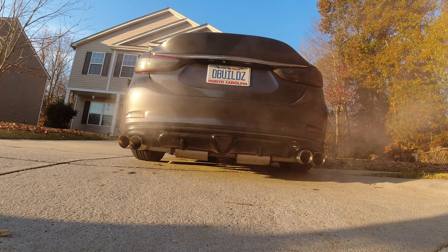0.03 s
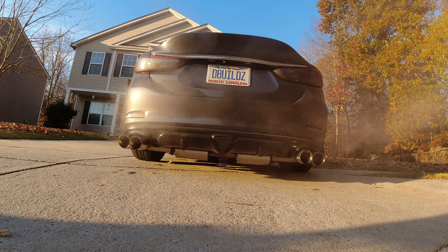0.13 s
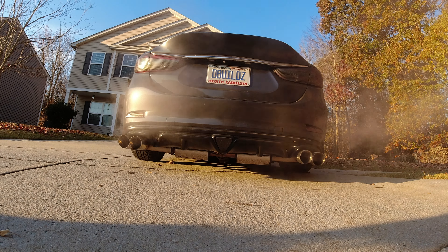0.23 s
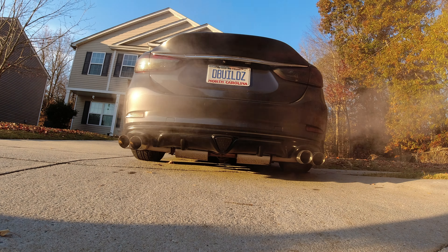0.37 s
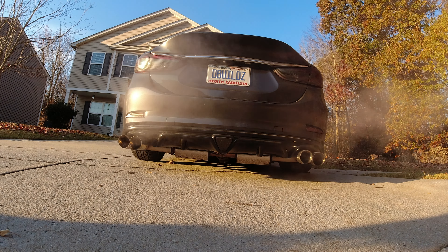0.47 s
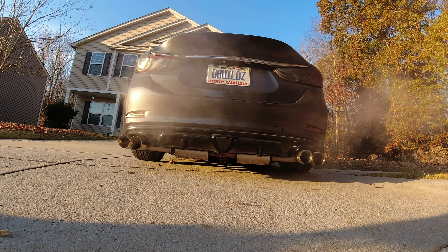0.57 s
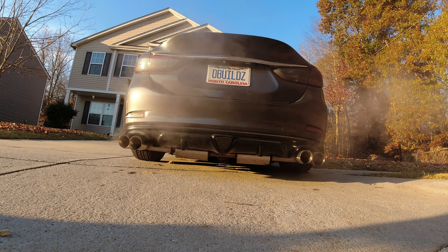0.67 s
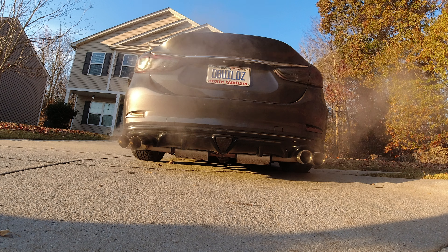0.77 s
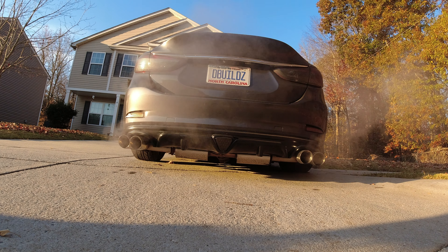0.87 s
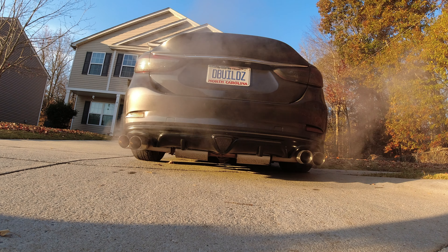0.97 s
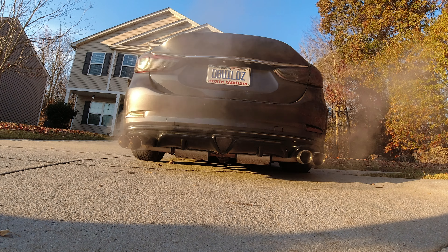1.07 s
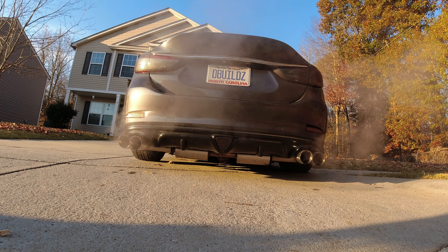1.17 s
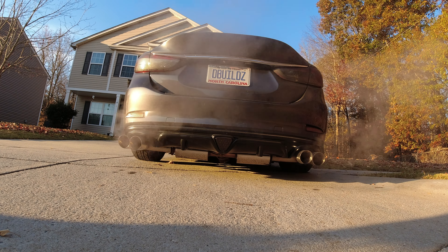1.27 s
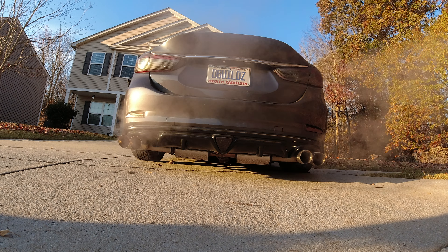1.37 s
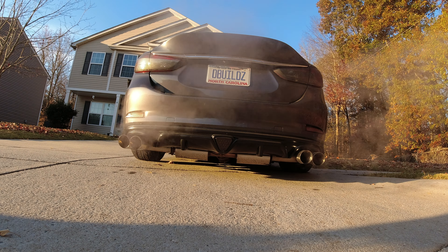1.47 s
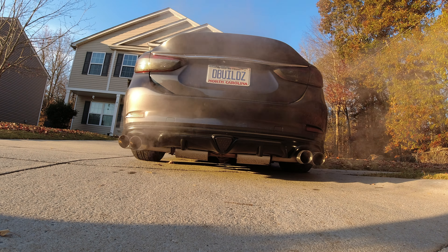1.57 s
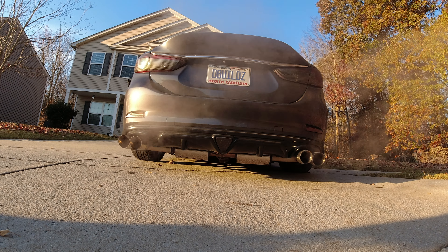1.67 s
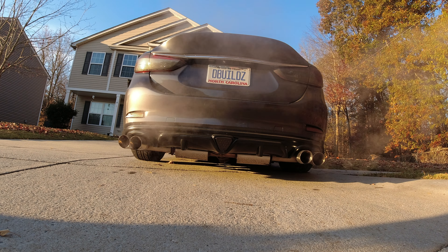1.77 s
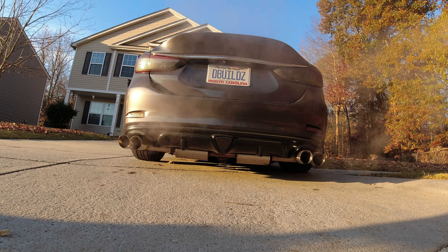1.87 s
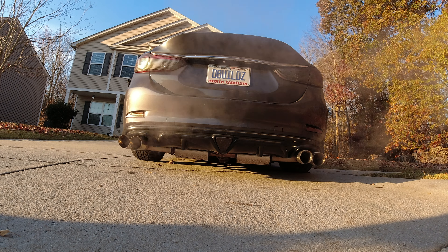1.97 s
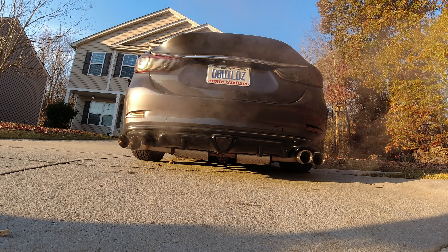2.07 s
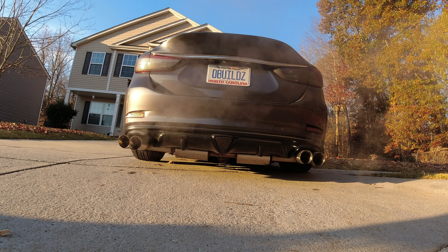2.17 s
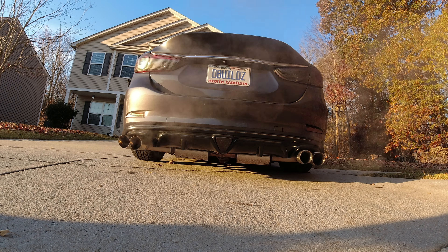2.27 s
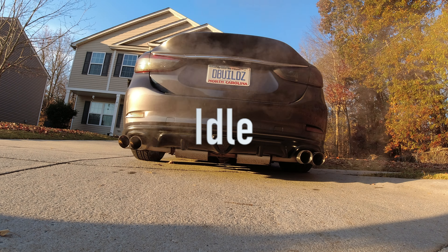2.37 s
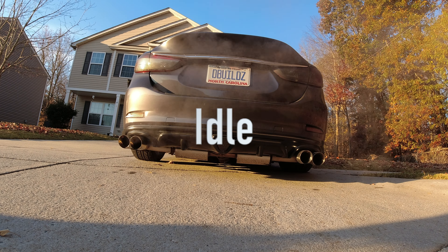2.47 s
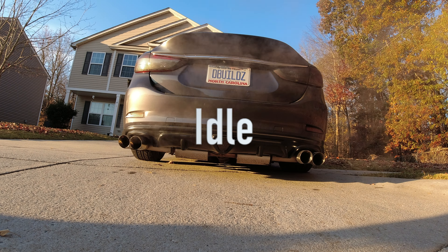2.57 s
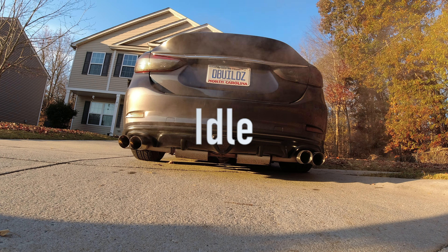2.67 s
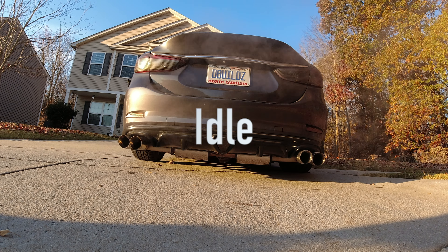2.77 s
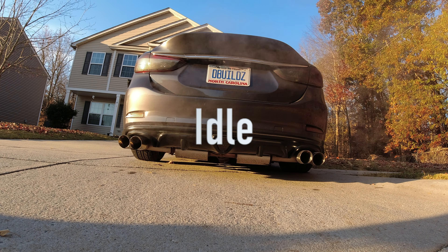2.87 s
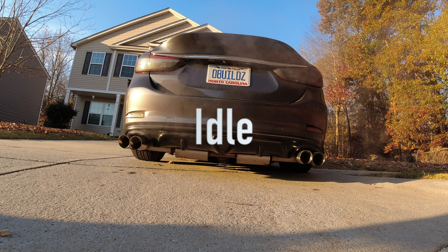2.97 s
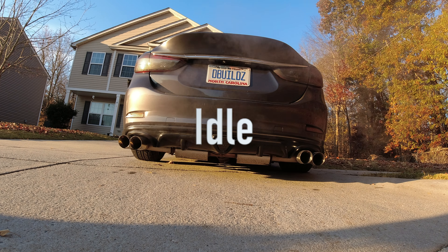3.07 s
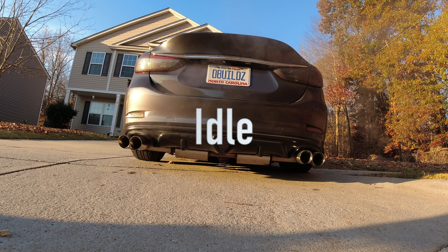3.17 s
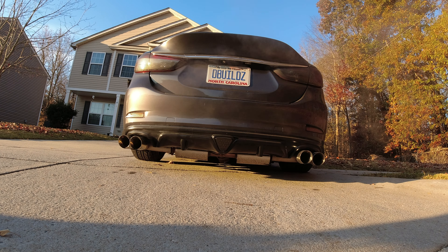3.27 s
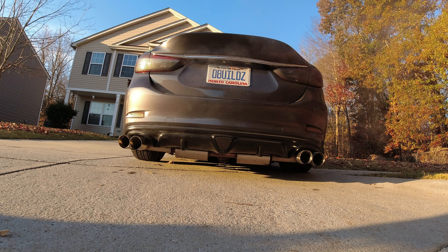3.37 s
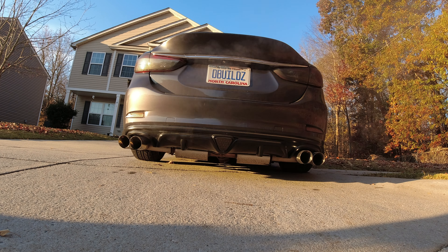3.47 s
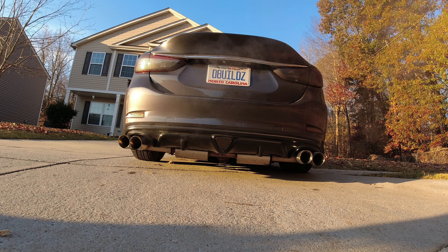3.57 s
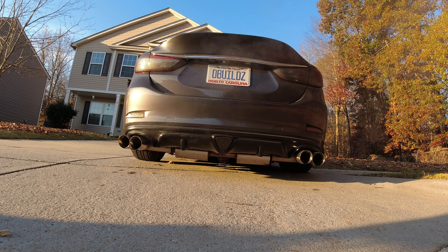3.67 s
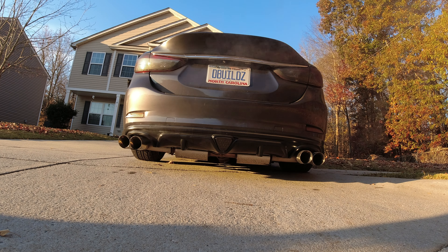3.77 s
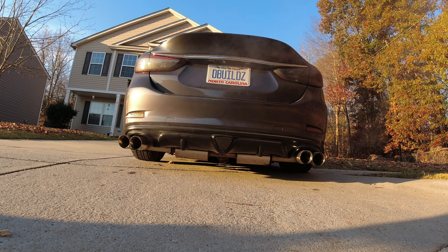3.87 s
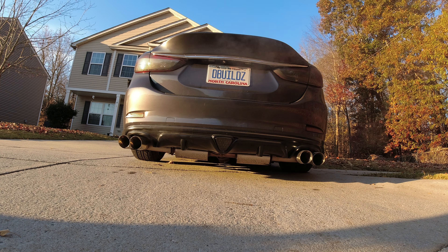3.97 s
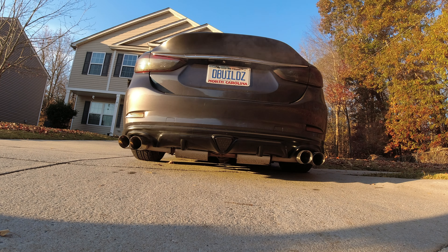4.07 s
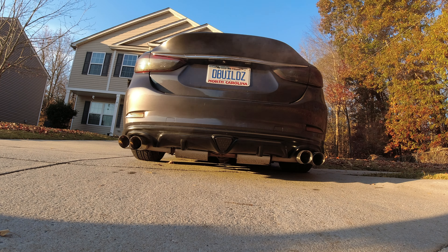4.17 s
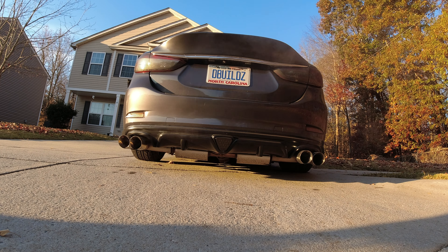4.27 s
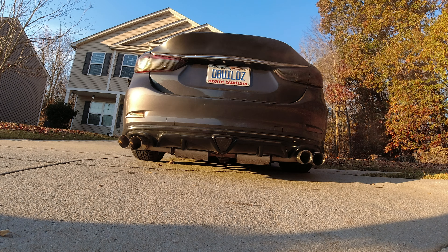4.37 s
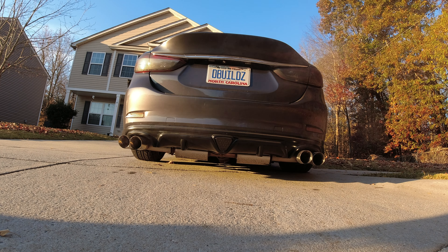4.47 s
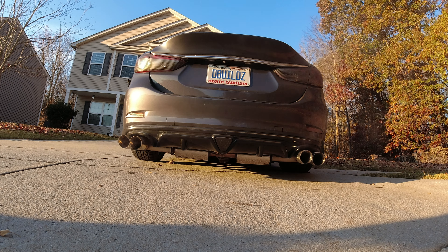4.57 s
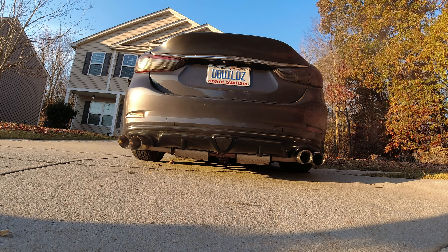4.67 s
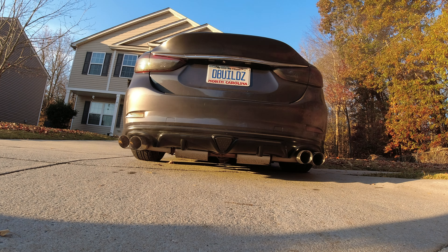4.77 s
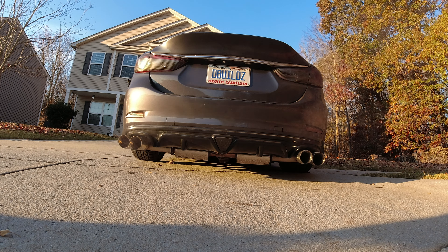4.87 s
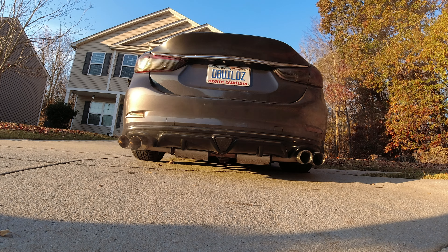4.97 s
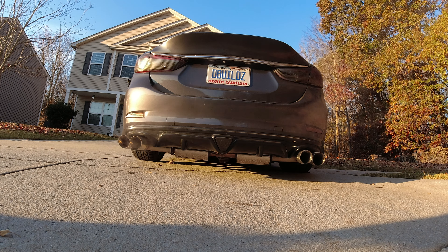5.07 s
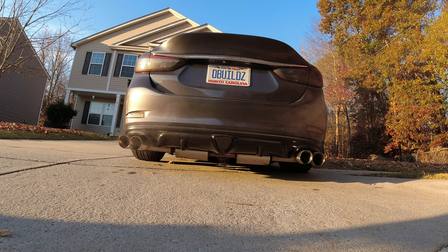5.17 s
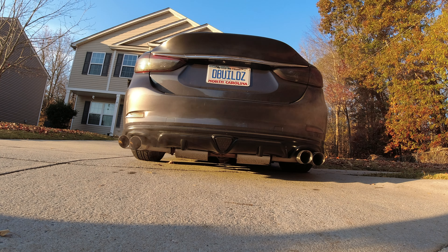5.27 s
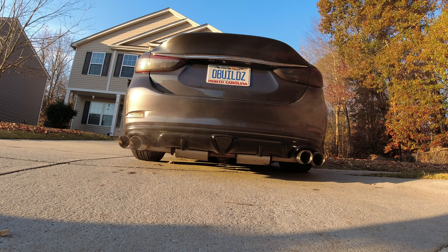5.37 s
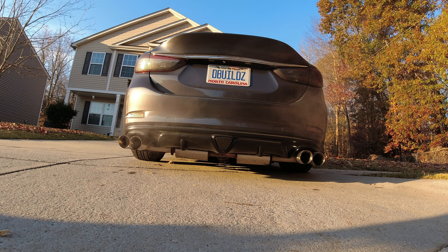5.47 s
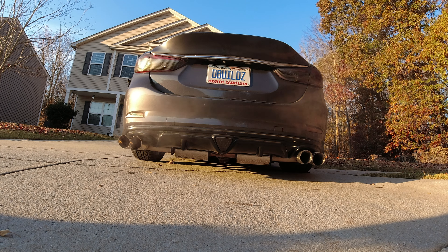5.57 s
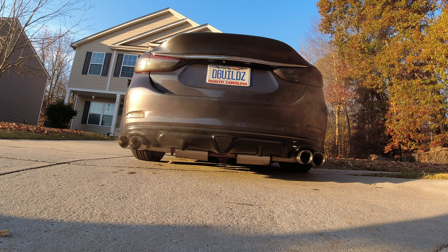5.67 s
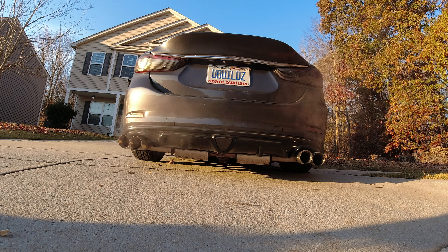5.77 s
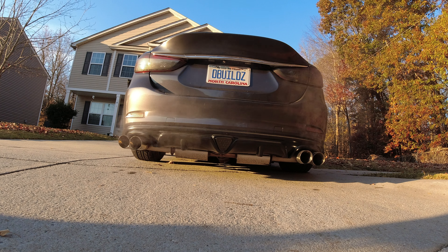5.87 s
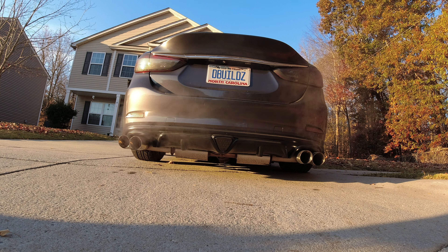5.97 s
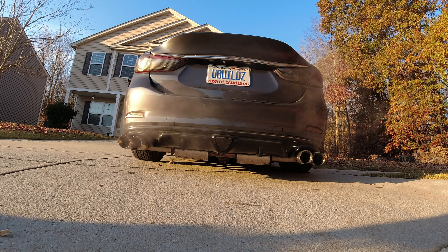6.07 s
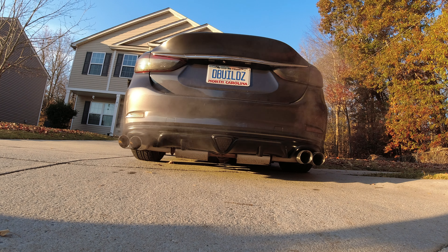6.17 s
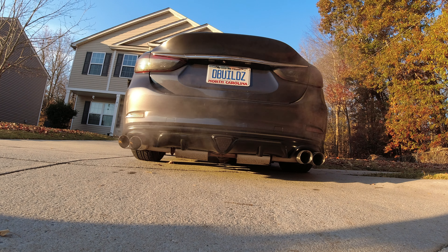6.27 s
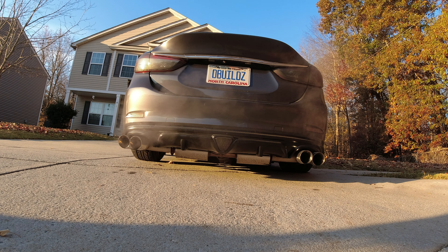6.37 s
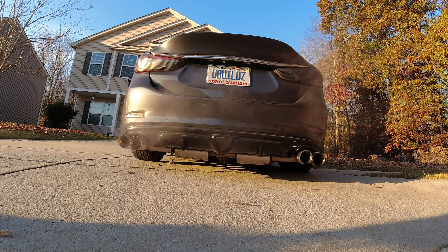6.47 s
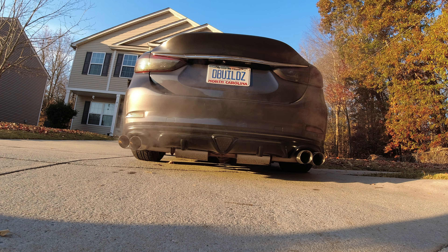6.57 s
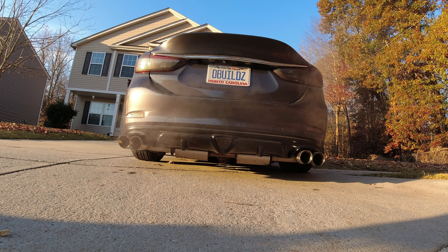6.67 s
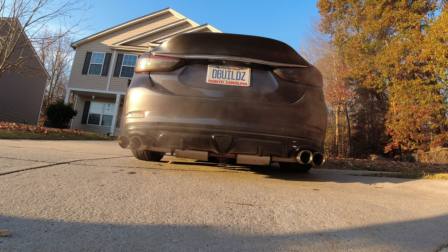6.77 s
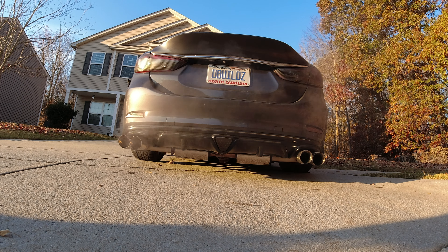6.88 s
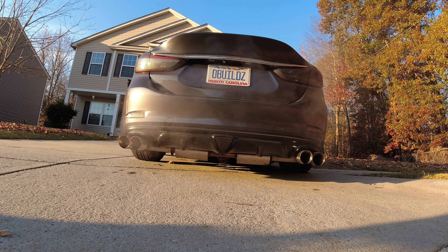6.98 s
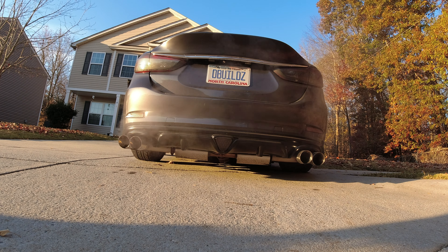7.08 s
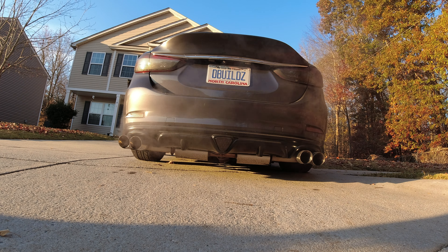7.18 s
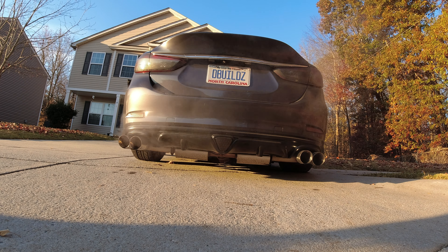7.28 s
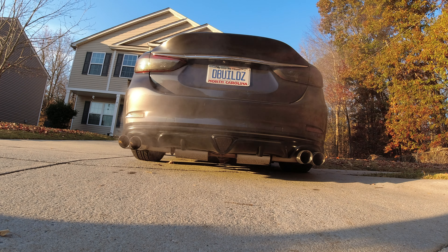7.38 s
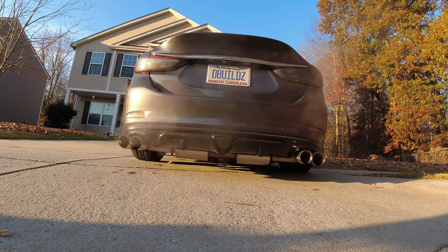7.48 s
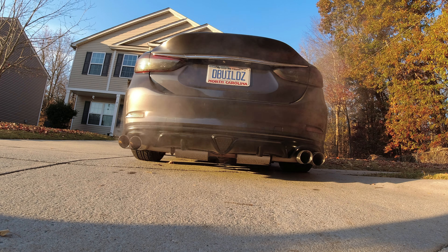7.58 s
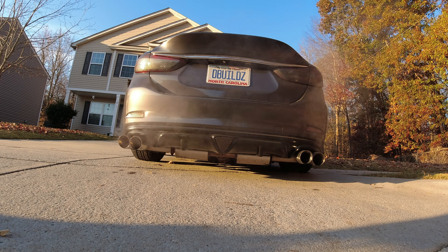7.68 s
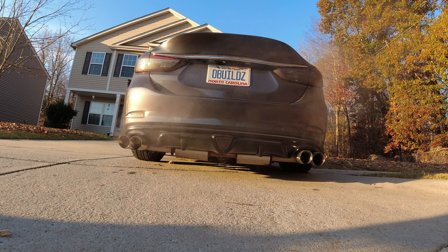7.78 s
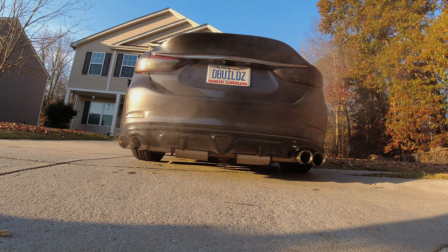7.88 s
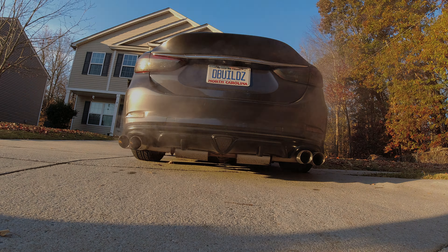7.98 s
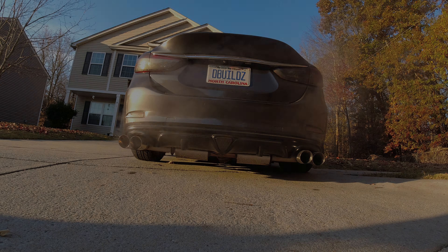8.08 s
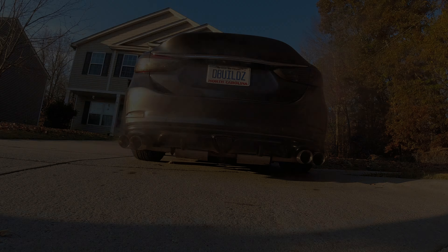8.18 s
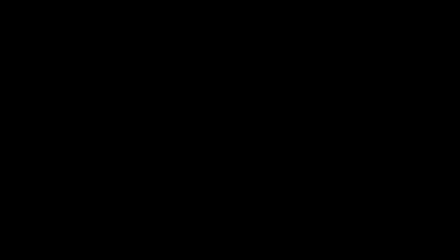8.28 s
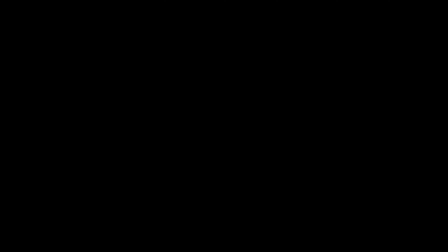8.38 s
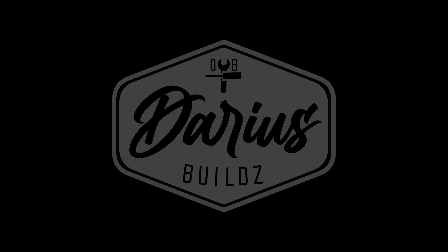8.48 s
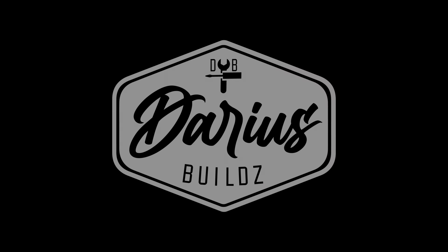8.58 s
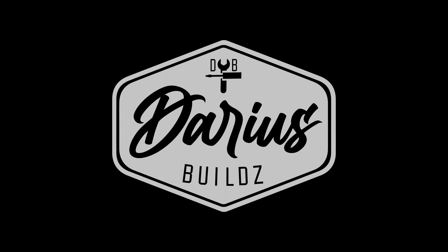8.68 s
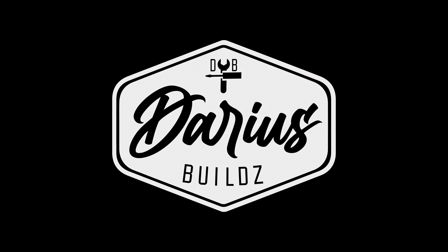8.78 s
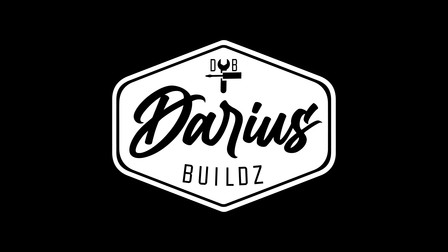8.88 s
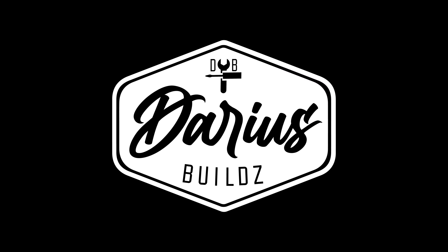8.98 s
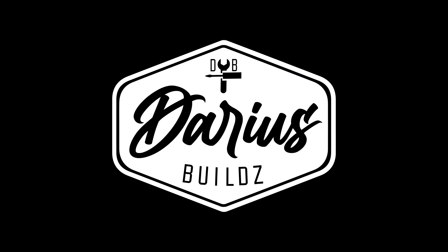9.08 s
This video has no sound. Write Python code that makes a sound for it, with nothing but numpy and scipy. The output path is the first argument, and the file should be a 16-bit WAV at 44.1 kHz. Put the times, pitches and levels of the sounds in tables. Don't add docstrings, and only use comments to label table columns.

```python
import sys
import numpy as np
from scipy import signal
from scipy.fft import rfft, irfft, next_fast_len
from scipy.io import wavfile

SR = 44100
rng = np.random.default_rng(int(sys.argv[2]) if len(sys.argv) > 2 else 0)


def to_linear_factor(level_db):
    exponent = np.asarray(level_db, float) / 20
    return 10 ** exponent


def to_wav(sig):
    pcm = np.clip(np.atleast_2d(sig), -1, 1) * 32767
    pcm = np.round(pcm).astype(np.int16)
    wavfile.write(sys.argv[1], SR, pcm.T)


N = 402625

# frequency [Hz], gain [dB].
PIPE = [(120, -10), (215, -12), (290, 0), (345, -2), (400, -14), (500, -25), (580, -24), (660, -48),
        (900, -64)]
# start_s, attack_s, end_s, release_s
BURBLE = (0.45, .17, .9, 0.033)
MISFIRE = (.722, .03, .79, .03)
WARM_UP = (2.2, 2.4)  # start_s, length_s
BURNT_OFF_S = .93
BOOM_DB, BOOM_HZ = -13, 57
TOP_HZ = 12900


def unit(x):
    return x / np.sqrt(np.mean(x ** 2) + 1e-20)


def along(points, hz):
    f, v = np.transpose(points)
    return np.interp(np.log(hz + 1), np.log(f + 1), v)


def curve(points):
    s, v = np.transpose(points)
    return np.interp(np.arange(N) / SR, s, v)


def wobble(knots_per_s):
    knots = rng.standard_normal(int(N * knots_per_s / SR) + 4)
    return np.interp(np.arange(N) * (knots_per_s / SR), np.arange(len(knots)), knots)


def ramp(start_s, length_s):
    return np.clip((np.arange(N) / SR - start_s) / length_s, 0, 1)


def gate(start_s, attack_s, end_s, release_s):
    return np.minimum(ramp(start_s, attack_s), 1 - ramp(end_s, release_s))


def both(a_db, b_db):
    per_db = np.log(10) / 10
    return np.logaddexp(a_db * per_db, b_db * per_db) / per_db


def filtered(x, response):
    m = next_fast_len(N + SR // 2)
    return irfft(rfft(x, m) * response(np.fft.rfftfreq(m, 1 / SR)), m)[:N]


def rattle(x, modes):
    def response(f):
        return np.sqrt(sum(to_linear_factor(2 * db) / (1 + ((f - c) / w * 2) ** 2) ** 1.7 for c, w, db in modes))
    return unit(filtered(x, response))


def puffs(turn, depth_db):
    return to_linear_factor(depth_db * np.cos(turn)) * rng.standard_normal(N)


def order(k, turn, skew, lead):
    return np.sqrt(2) * np.cos(k * turn + skew * (k - 1) + lead * (k > 1))


def engine_speed():
    # time [s], firing rate [firings per s].
    speed = [(0, 101.24), (.13, 92.64), (.28, 82.88), (.5, 69.61), (.72, 57.39), (.77, 56.69), (.84, 55.22),
             (.87, 55.11), (.93, 52.55), (.98, 51.88), (1.15, 45.26), (1.35, 38.92), (1.55, 33.66),
             (1.75, 30.57), (1.9, 29.23), (3, 28.5), (4.4, 28.7), (6.5, 28.1)]
    return curve(speed)


def engine_load():
    # time [s], load [dB].
    load = [
        (1, -6.5),
        (1.5, -3.5),
        (1.9, -2.5),
        (2.6, -0.5),
        (4.49, -3.5),
        (4.54, -10.5),
        (5.4, -14),
        (8, -17),
    ]
    return curve(load)


def silencer_db(hz, hot=0):
    # frequency [Hz], width [Hz], gain [dB].
    resonances = [(56.9, 11.5, 1.9), (110.9, 23.5, 1.6), (188.2, 20.2, .8), (270.4, 23.9, 7.7),
                  (355, 55.5, 7.8)]
    notch_hz, notch_width_hz, notch_db = 214, 10, -16
    f = np.arange(20, 440.)
    passed = 0
    for i, (c, w, db) in enumerate(resonances):
        passed = passed + (-1) ** i * to_linear_factor(db) * 1j * f * w / (c * c - f * f + 1j * f * w)
    notch = np.exp(-((hz - notch_hz) / notch_width_hz) ** 2)
    return np.interp(hz, f, 20 * np.log10(np.abs(passed))) + hot * notch_db * notch


def low_orders(rate, load_db):
    # time [s], level [dB].
    pumping = [(0, -8), (.3, -11.5), (.5, -14.5), (.72, -14.5), (.9, -17.5), (1.1, -20), (1.5, -30),
               (2.1, -62)]
    # pumping [dB], loss once fuel is burnt off [dB], change in misfire [dB],
    # idle level [dB], share of load followed [ratio].
    order_law = [(0.5, 0.5, -4.5, -48.5, 0.053), (-11.5, -12, -2, -31.9, 1.0), (-15, -10, 4.7, -47.5, .55),
                 (-22.5, -12, 7, -40, 0.49)]
    idle_hz = 28.6
    pumping_db = curve(pumping)
    burnt = ramp(BURNT_OFF_S, .05)
    stumble = gate(*MISFIRE)
    hot = 1 - ramp(*BURBLE[:2])
    levels_db = []
    for k, (db, loss_db, slip_db, idle_db, share) in enumerate(order_law, 1):
        coast_db = pumping_db + db + loss_db * burnt + slip_db * stumble
        firing_db = idle_db + share * load_db - silencer_db(k * idle_hz)
        levels_db.append(silencer_db(k * rate, hot) + both(coast_db, firing_db))
    return levels_db


def exhaust_pulse(rate, turn, low_db):
    # firing rate [firings per s], skew [rad per order], lead of overtones [rad].
    shape = [(30.1, 4.99, -.7), (31.7, 5.6, -2.5), (36, 4.58, -1.6), (42, 3.14, 0), (47, 3.14, 0),
             (52, 3.14, 1.4), (82, 3.14, 1.6), (88, 3.14, 1), (101, 3.14, .7)]
    speeds, skews, leads = np.transpose(shape)
    skew = np.interp(rate, speeds, skews)
    lead = np.interp(rate, speeds, leads) - 3.4 * gate(.722, .02, .79, .02)
    low = sum(to_linear_factor(db + .5 * wobble(9)) * order(k, turn, skew, lead) for k, db in enumerate(low_db, 1))

    edge = 0
    for k in range(5, 8):
        order_db = along(PIPE, k * rate) + 2 * wobble(25) - 2.5 * (k - 5)
        edge = edge + to_linear_factor(order_db) * order(k, turn, skew, lead)
    unequal = sum(to_linear_factor(3 * wobble(15) - 26) * order(k + .5, turn, skew, lead) for k in range(1, 5))

    start_db, fall_db_per_s2, burble_db, after_db = -17.5, 95.5, -30.5, -61
    t = np.arange(N) / SR
    rev_db = start_db - fall_db_per_s2 * t ** 2
    pop_db = after_db - 20 * np.abs(t - BURNT_OFF_S) + (burble_db - after_db) * gate(*BURBLE)
    return low + to_linear_factor(both(rev_db, pop_db)) * (edge + unequal)


def exhaust_rasp(turn):
    start_db, burble_db, after_db, fall_db_per_s = -45, -38, -58, 20
    burnt = ramp(*BURBLE[2:])
    before_db = start_db + (burble_db - start_db) * gate(*BURBLE)
    dying_db = after_db - fall_db_per_s * np.abs(np.arange(N) / SR - BURNT_OFF_S)
    level_db = before_db * (1 - burnt) + dying_db * burnt
    response = [(25, -30.0), (60, -8)] + PIPE
    return to_linear_factor(level_db) * unit(filtered(puffs(turn, depth_db=8), lambda hz: to_linear_factor(along(response, hz))))


def idle_beat(turn, rate, load_db):
    # order [firing-rate multiple], level [dB].
    lope = [(3.25, -18.5), (3.75, -25), (4.5, -25), (5, -2.5), (5.25, -23), (5.5, -6), (6, -7),
            (6.5, -14.5), (7, -4), (7.5, -13.5), (8, -10), (9, -8), (10, -18.5), (10.5, -18), (12, -18.5)]
    speeds, skews, _ = np.transpose([(30.1, 4.99, -.7), (31.7, 5.6, -2.5), (36, 4.58, -1.6), (42, 3.14, 0),
                                     (47, 3.14, 0), (52, 3.14, 1.4), (82, 3.14, 1.6), (88, 3.14, 1),
                                     (101, 3.14, .7)])
    skew = np.interp(rate, speeds, skews)
    beat = 0
    for k, db in lope:
        if k % 1 == 0:
            phase = np.pi * (k >= 6) - 1.3
        else:
            phase = 2 * np.pi * rng.random()
        beat = beat + to_linear_factor(db + 1.6 * wobble(5)) * order(k, turn, skew, phase + .3 * wobble(7))
    catch_start_s, catch_rise_s = 1.48, 0.71
    return to_linear_factor(-49.5 - .13 * load_db - 8 * (1 - ramp(catch_start_s, catch_rise_s))) * beat


def gas_rush(turn):
    # frequency [Hz], gain [dB].
    gas_colour = [(8, -15.5), (20, -7.5), (45, -11), (90, -6), (150, -3.5), (260, -12), (337, -12.5),
                  (1090, -17.5), (1700, -30), (2210, -46.5), (3740, -120)]
    level_db = -46.5 - 2 * (1 - ramp(*WARM_UP)) + gate(*BURBLE) - gate(*MISFIRE)
    noise = puffs(turn + 1.2, depth_db=0.0) * to_linear_factor(0.53 * wobble(22))
    return to_linear_factor(level_db) * unit(filtered(noise, lambda hz: to_linear_factor(along(gas_colour, hz))))


def metal_buzz(rate, turn, boom_db):
    # frequency [Hz], gain [dB].
    metal_colour = [(820, -24.5), (1400, -10), (2080, -5), (2290, -2.5), (2660, -9.5), (3440, -6.5),
                    (4270, -21.5), (4810, -18.5), (7130, -30.5), (12300, -31.5), (12900, -40.5),
                    (13300, -54.5), (14800, -53.5)]
    # frequency [Hz], width [Hz], gain [dB].
    panel_modes = [(1640, 13, -3), (1810, 49, 5), (2470, 35, -4), (2785, 47, 6), (3490, 550, -9.5),
                   (4560, 110, -8.5), (5300, 1900, -11)]
    start_db, db_per_octave, from_hz, warm_db, per_boom = -68.5, 9, 33.9, 2.5, 0.88
    near = np.exp(-((rate - BOOM_HZ) / 6) ** 2)
    level_db = start_db + db_per_octave * np.log2(np.maximum(rate / from_hz, 1))
    level_db = level_db + warm_db * ramp(*WARM_UP) + per_boom * near * (boom_db - BOOM_DB + 4)
    metal = unit(filtered(puffs(turn, depth_db=1.0),
                          lambda hz: to_linear_factor(along(metal_colour, hz) - 18 * (hz > TOP_HZ))))
    panels = rattle(puffs(turn + 2.2, depth_db=2) * to_linear_factor(3.2 * wobble(20)), panel_modes)
    panels_db = 1.51 * np.maximum(level_db + 67, 0) - 77.0
    return to_linear_factor(level_db + 1.17) * metal + to_linear_factor(panels_db) * panels


def shield_rattle(rate, turn, boom_db):
    # frequency [Hz], width [Hz], gain [dB].
    shield_modes = [(5700, 200, -11), (7000, 330, -4), (7800, 200, -9), (8150, 260, -8), (8650, 200, -12),
                    (4200, 1500, -9), (10500, 5000, -21)]
    start_db, per_boom, db_per_hz, idle_db = -65, 1.7, .19, -86.7
    boom_part_db = start_db + per_boom * (boom_db - BOOM_DB) - db_per_hz * np.maximum(rate - BOOM_HZ, 0)
    level_db = 1.68 * np.maximum(both(boom_part_db, idle_db) + 86.5, 0) - 96.5
    return to_linear_factor(level_db) * rattle(puffs(turn + 2.2, depth_db=7) * to_linear_factor(2.5 * wobble(40)), shield_modes)


def ticks(cycle, sharp, hz, width_hz):
    strikes = np.exp(sharp * (np.cos(cycle) - 1)) * to_linear_factor(1.8 * wobble(9))
    return unit(filtered(strikes * rng.standard_normal(N),
                         lambda f: (f < TOP_HZ) / (1 + ((f - hz) / width_hz) ** 4)))


def valve_gear(turn):
    valve_s, injector_s = 2.147, 3.42
    valve = ticks((turn - turn[round(valve_s * SR)]) / 4, 11, 3300, 320)
    injector = ticks((turn - turn[round(injector_s * SR)]) / 2, 30, 10800, 2200)
    return to_linear_factor(-78) * valve + to_linear_factor(-97.0) * injector


def fan_whine():
    whine = np.sin(2 * np.pi * np.cumsum(798 + 2.8 * wobble(6)) / SR)
    return to_linear_factor(20 * gate(.2, .3, 1.55, .2) - 81.5 + 2.3 * wobble(19)) * whine


def singing_panels():
    # start [s], length [s], frequency [Hz], level [dB].
    tones = [
        (.1, 0.12, 2196, -58),
        (.26, 0.11, 1810, -54.5),
        (.5, 0.11, 2410, -57.5),
        (.49, 0.13, 1900, -65),
        (.53, 0.075, 1640, -65),
        (.78, 0.1, 1640, -69),
        (.95, .5, 11550, -90),
    ]
    out = np.zeros(N)
    waver = wobble(60)
    for s, length_s, hz, db in tones:
        start = round(s * SR)
        part = waver[start:][:round(length_s * SR)]
        tone = np.sin(2 * np.pi * np.cumsum(hz + 14 * part) / SR)
        out[start:][:len(part)] += to_linear_factor(db + 3 * part) * np.hanning(len(part)) * tone
    return out


def birds():
    # start [s], length [s], start pitch [Hz], end pitch [Hz], level [dB].
    calls = [(4.185, 0.029, 5460, 8600, -63), (4.198, .026, 5560, 8740, -55),
             (3.988, 0.076, 5220, 5300, -73), (4.57, .04, 5460, 5170, -75), (5.31, .03, 5470, 5840, -71),
             (5.531, 0.057, 4970, 5330, -74), (6.143, 0.057, 5290, 5300, -69),
             (6.316, .02, 5340, 6300, -73), (7.193, 0.025, 4700, 5850, -65.5),
             (7.31, 0.026, 5000, 5800, -74), (8.123, .06, 5180, 5300, -73)]
    direct = np.zeros(N)
    flutter = wobble(600)
    for s, length_s, start_hz, end_hz, db in calls:
        start = round(s * SR)
        u = np.arange(round(length_s * SR)) / (length_s * SR)
        hz = end_hz + (start_hz - end_hz) * (1 - u) ** 2.5
        hz = hz + 100 * (db < -64) * flutter[start:][:len(u)]
        call = np.sin(np.pi * u ** 0.69) * np.sin(2 * np.pi * np.cumsum(hz) / SR)
        direct[start:][:len(u)] += to_linear_factor(db) * call
    t = np.arange(SR // 3) / SR
    tail = rng.standard_normal(len(t)) * to_linear_factor(-60 * t / .4) * (t > .02)
    return direct + to_linear_factor(-8.5) * signal.fftconvolve(direct, tail / np.linalg.norm(tail))[:N]


def scene():
    rate, load_db = engine_speed(), engine_load()
    turn = 2 * np.pi * np.cumsum(rate) / SR - 1.1
    low_db = low_orders(rate, load_db)
    boom_db = low_db[0]
    exhaust = exhaust_pulse(rate, turn, low_db) + exhaust_rasp(turn) + idle_beat(turn, rate, load_db)
    metal = metal_buzz(rate, turn, boom_db) + shield_rattle(rate, turn, boom_db) + singing_panels()
    mix = exhaust + gas_rush(turn) + metal + valve_gear(turn) + fan_whine() + birds()
    return mix[None]


def low_pass(x):
    return signal.sosfilt(signal.butter(12, 14960, fs=SR, output="sos"), x)


def record(dry):
    fade_s, fade_length_s = 7.867, 1
    fade = np.cos(np.pi / 2 * ramp(fade_s, fade_length_s)) ** 2.03
    return low_pass(dry * fade)


dry = scene()
out = record(dry)
to_wav(out)
```